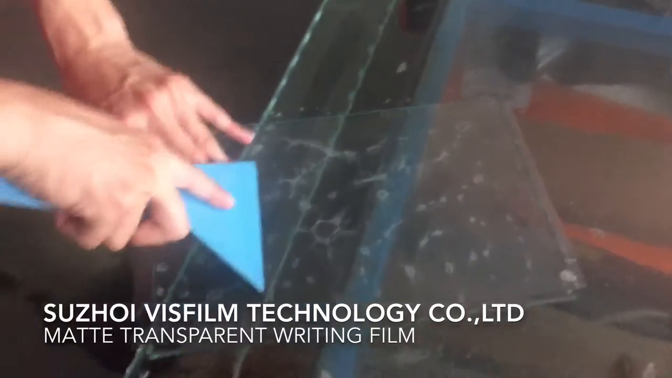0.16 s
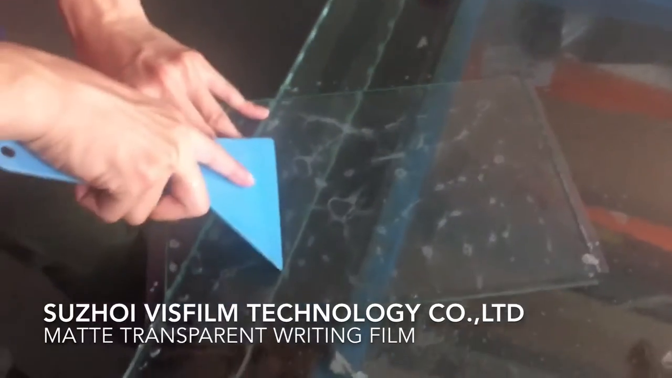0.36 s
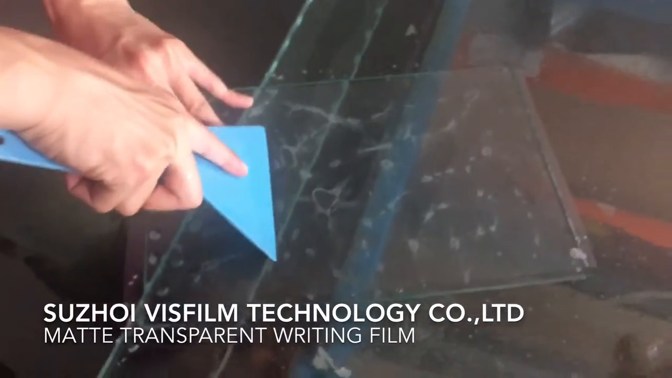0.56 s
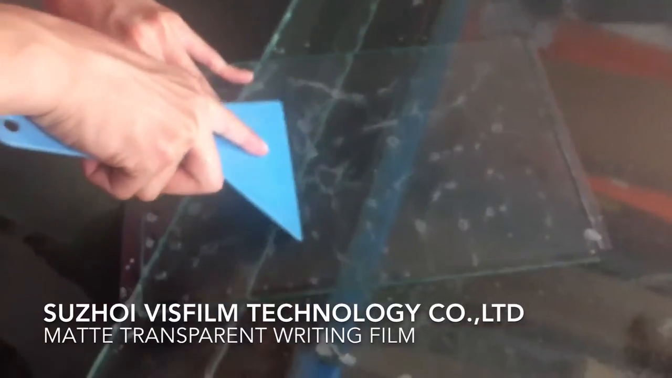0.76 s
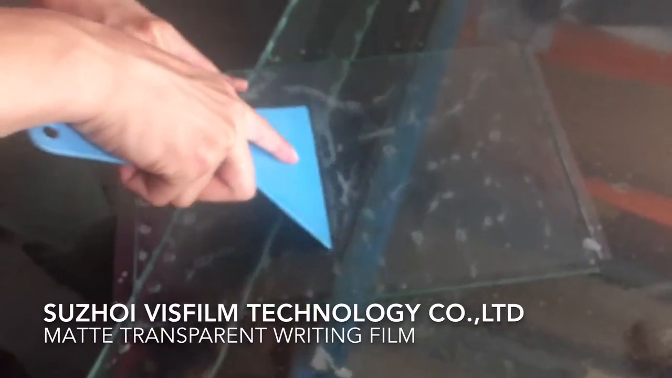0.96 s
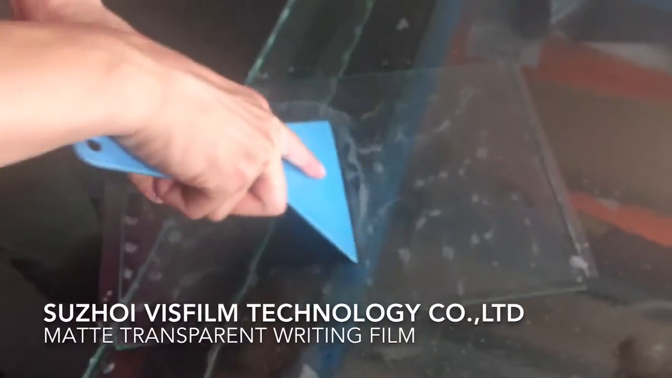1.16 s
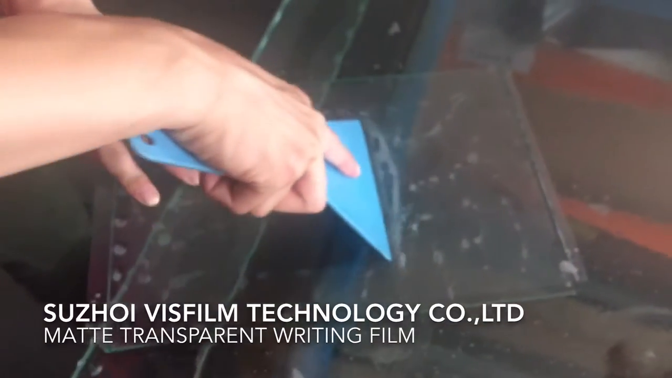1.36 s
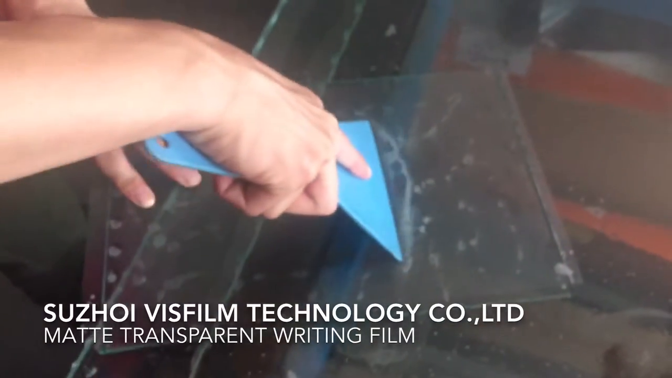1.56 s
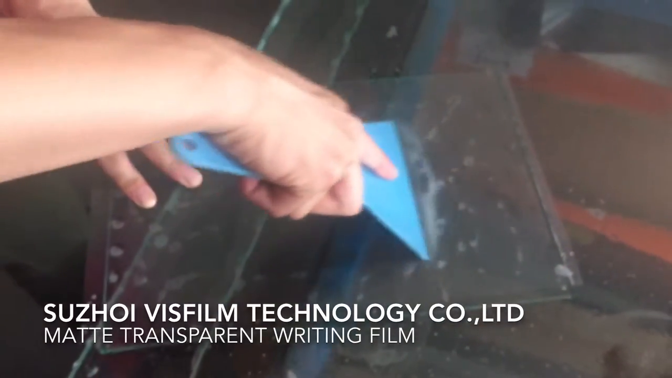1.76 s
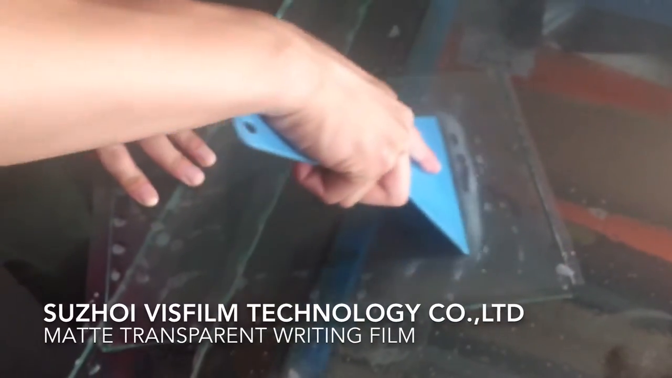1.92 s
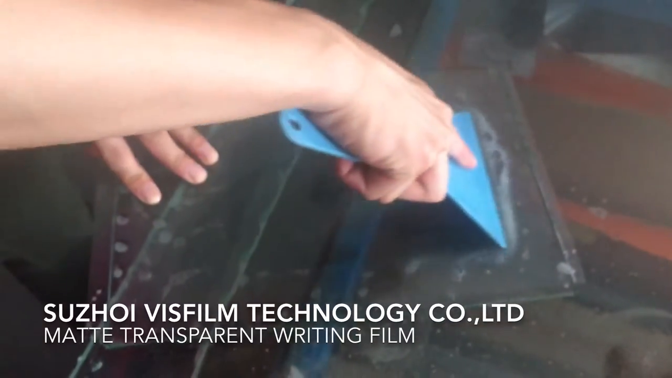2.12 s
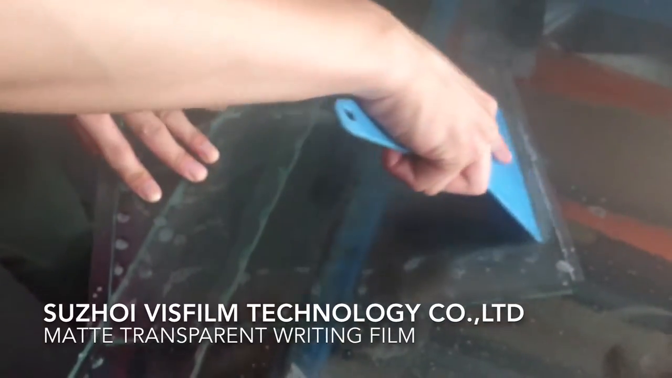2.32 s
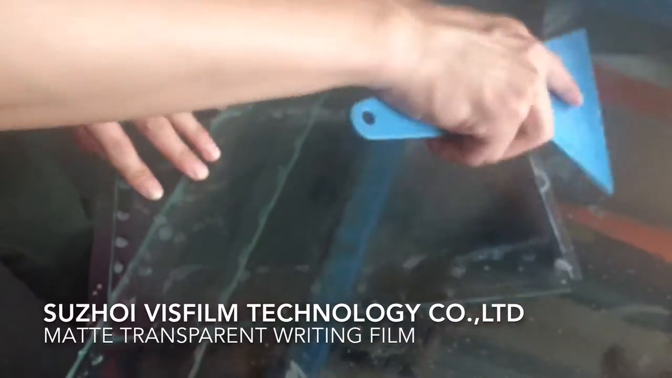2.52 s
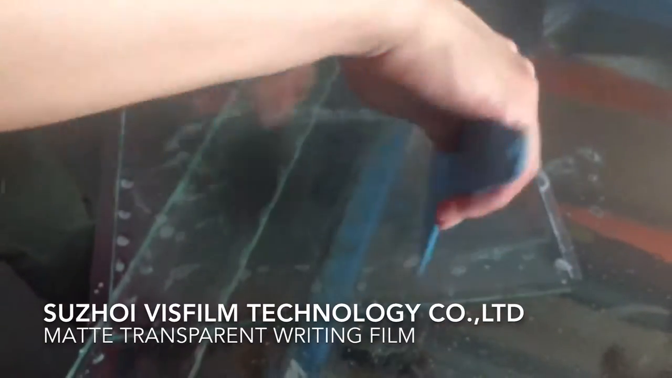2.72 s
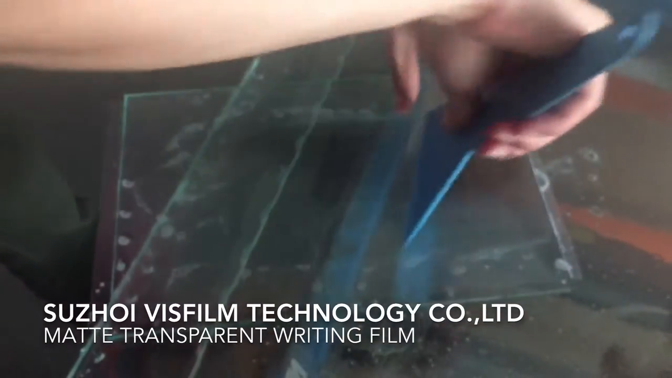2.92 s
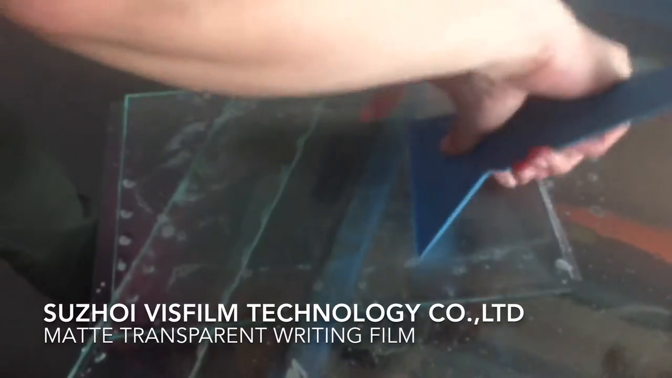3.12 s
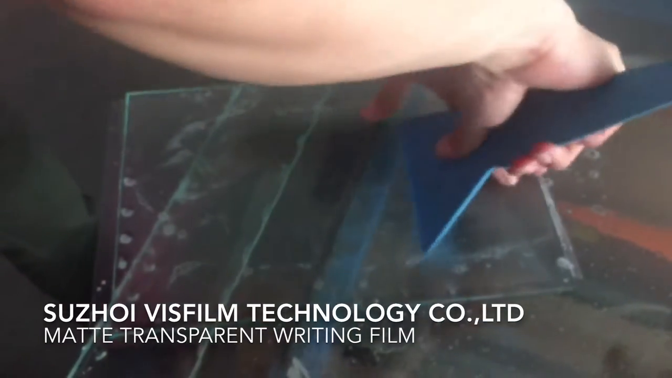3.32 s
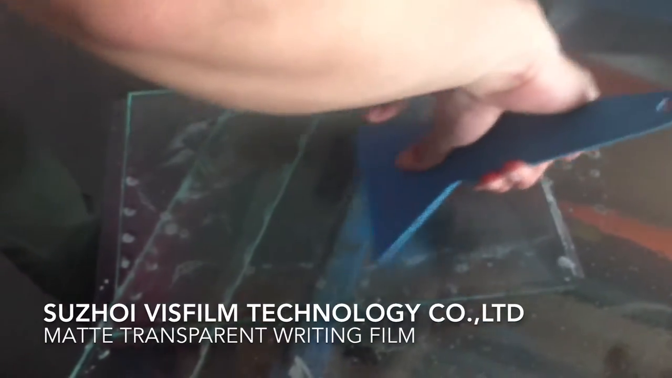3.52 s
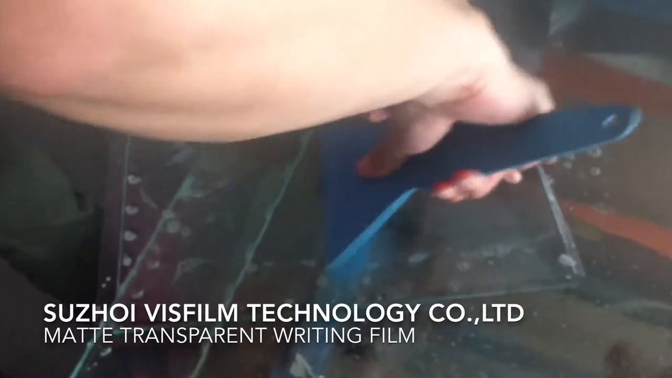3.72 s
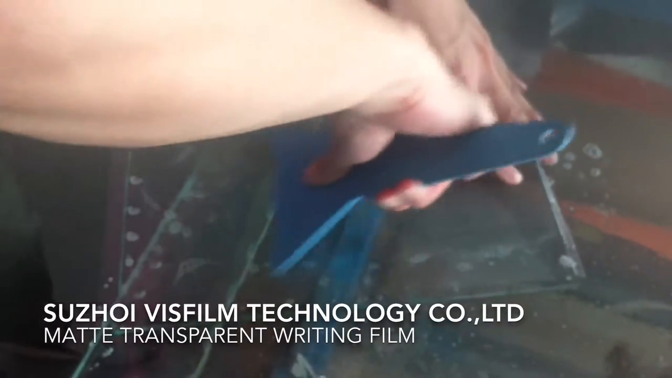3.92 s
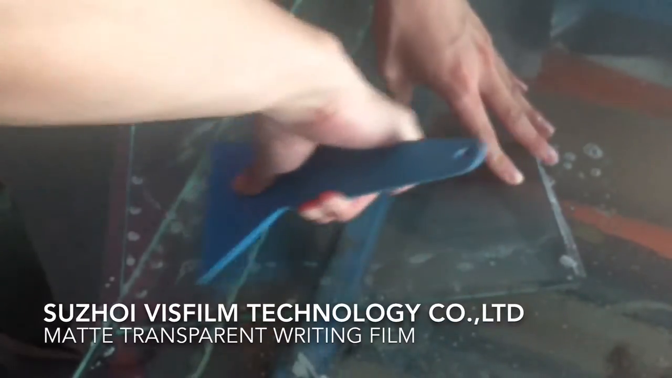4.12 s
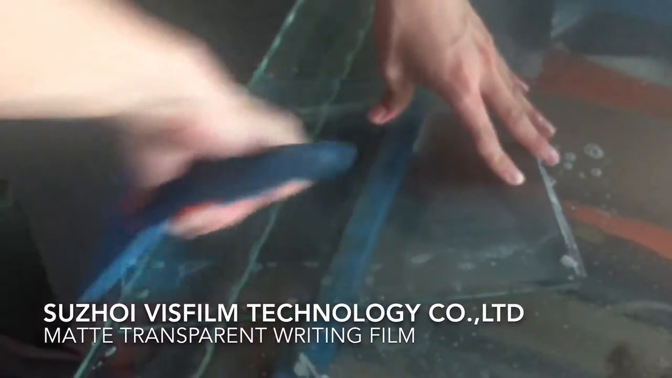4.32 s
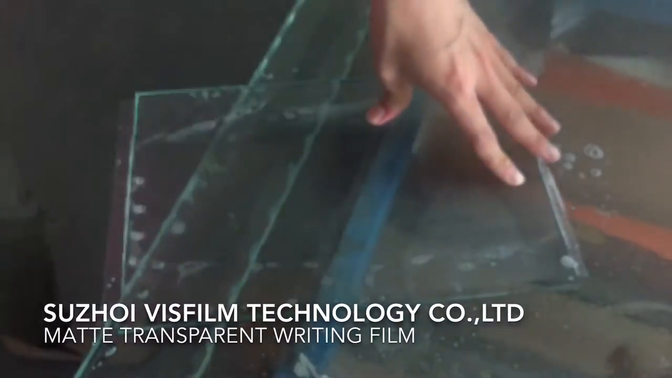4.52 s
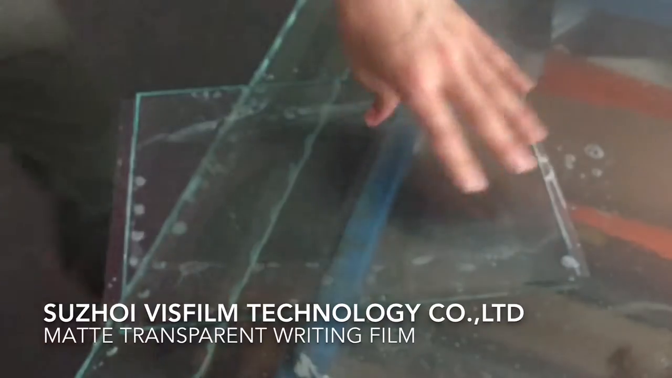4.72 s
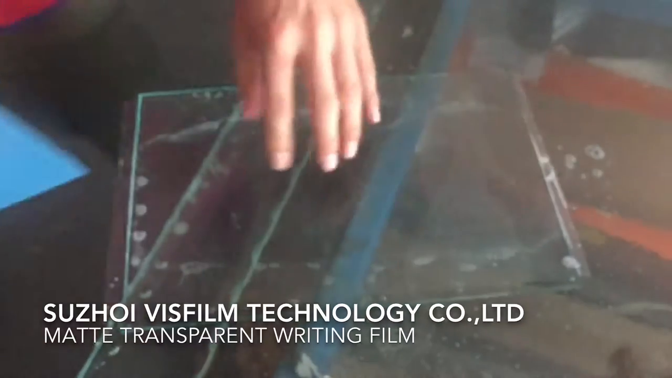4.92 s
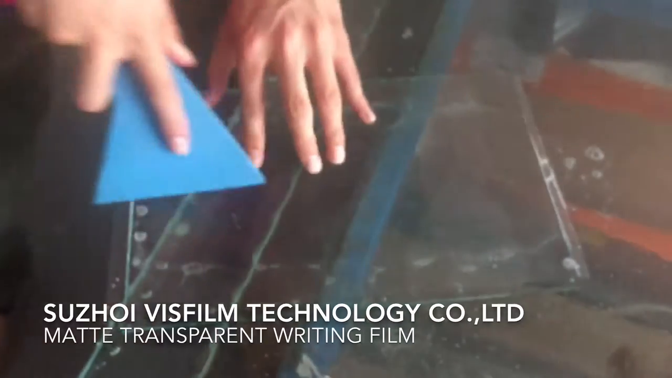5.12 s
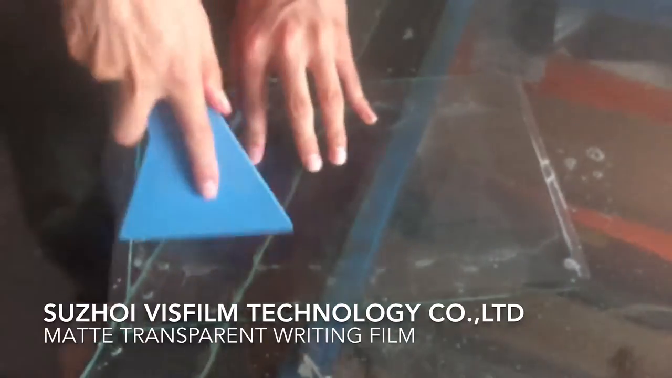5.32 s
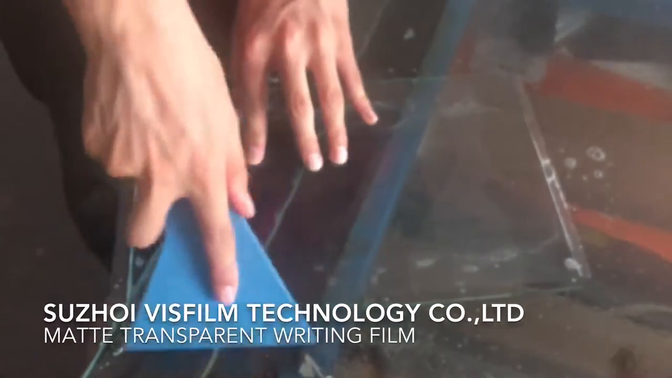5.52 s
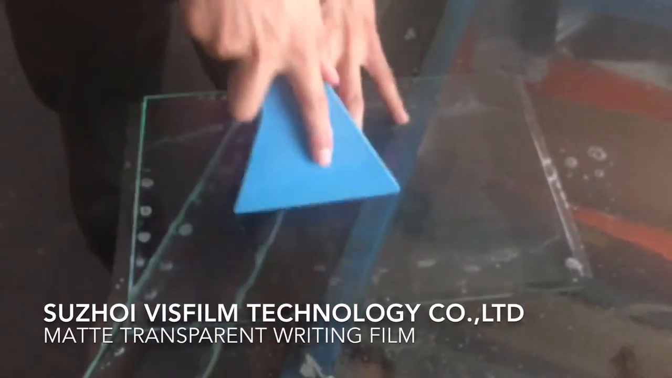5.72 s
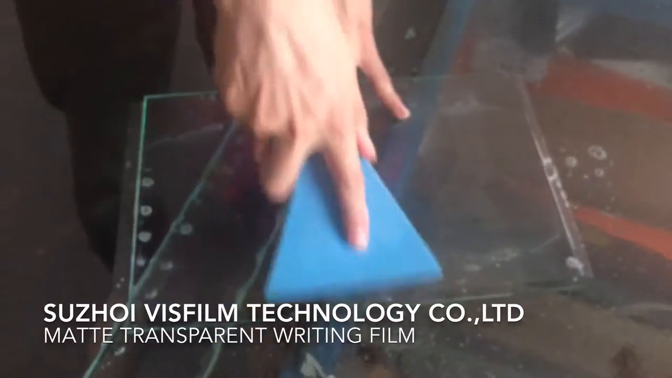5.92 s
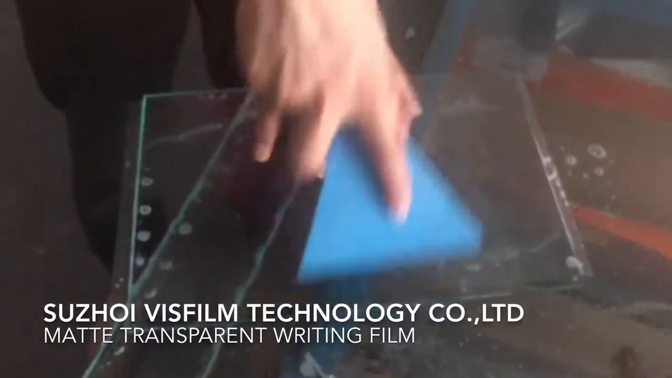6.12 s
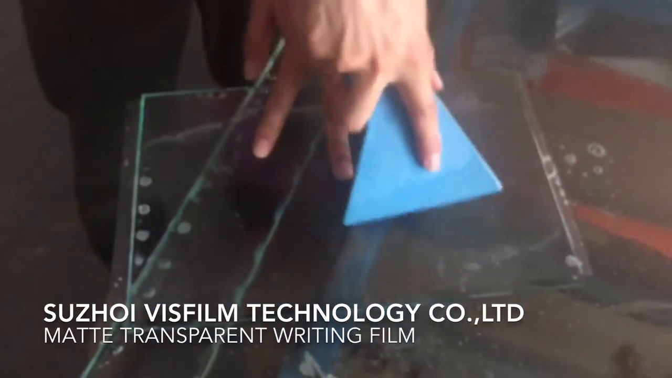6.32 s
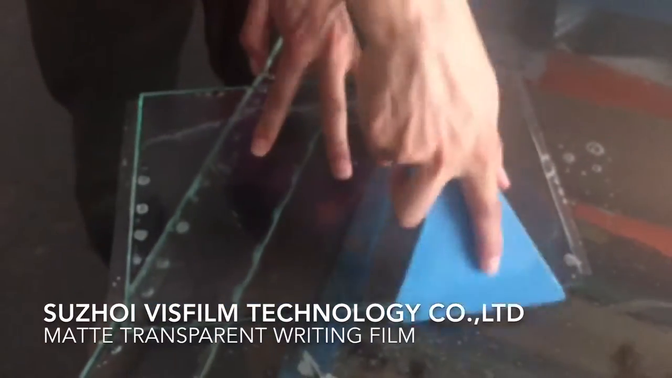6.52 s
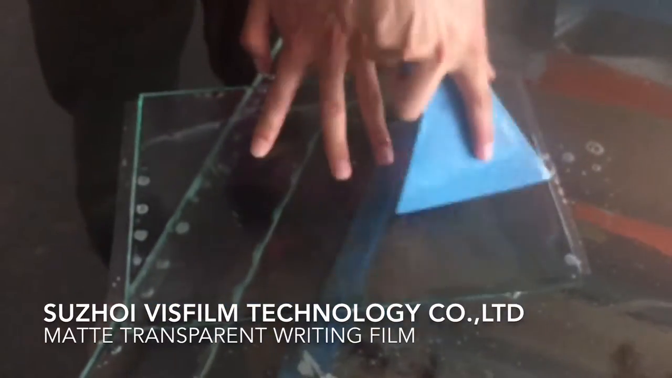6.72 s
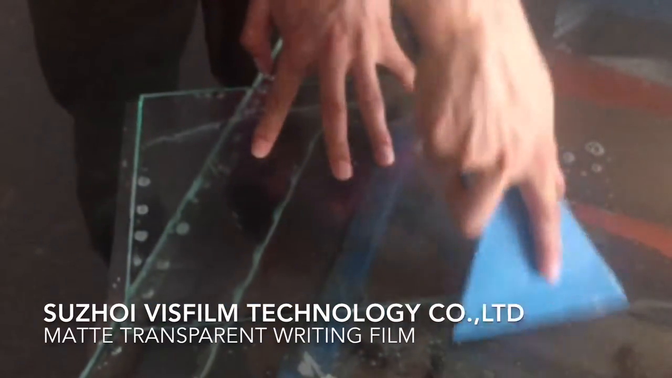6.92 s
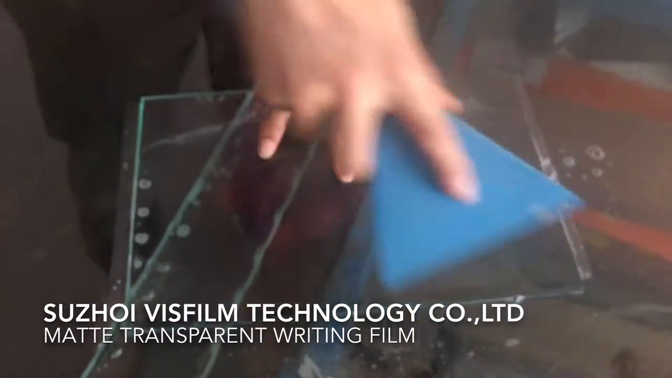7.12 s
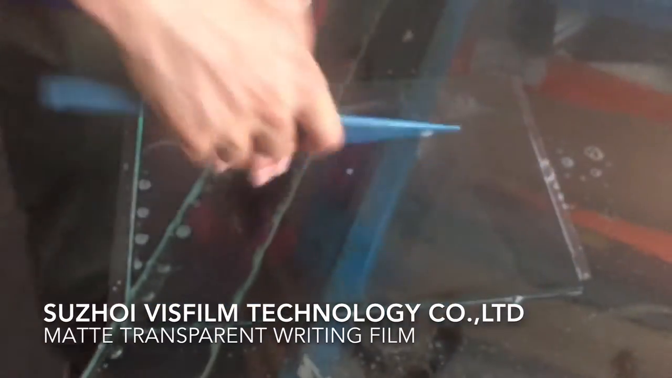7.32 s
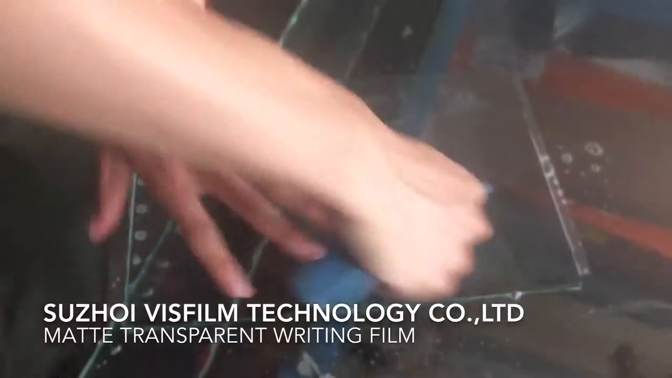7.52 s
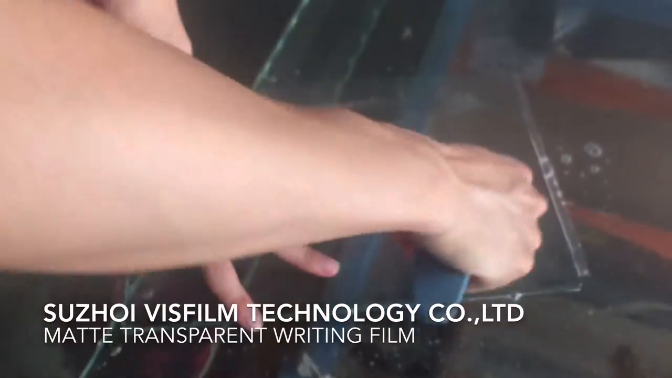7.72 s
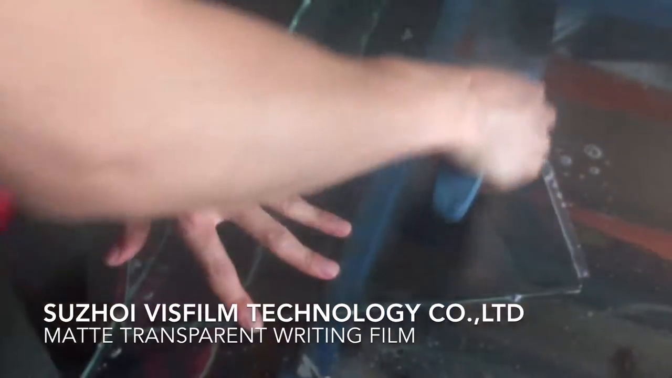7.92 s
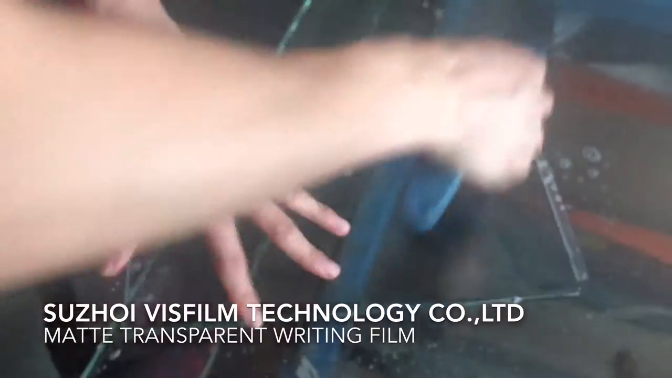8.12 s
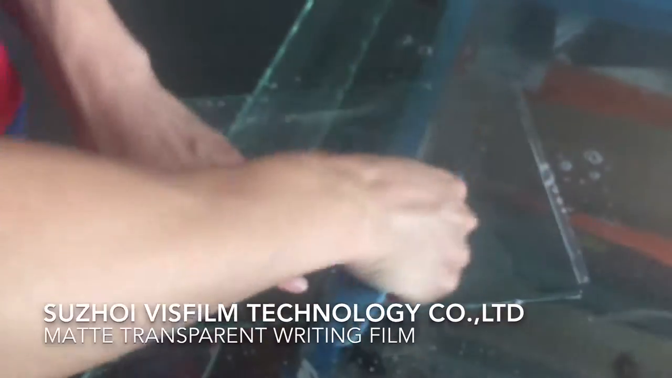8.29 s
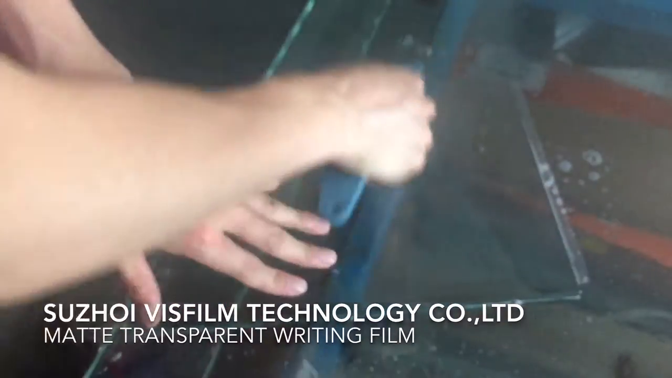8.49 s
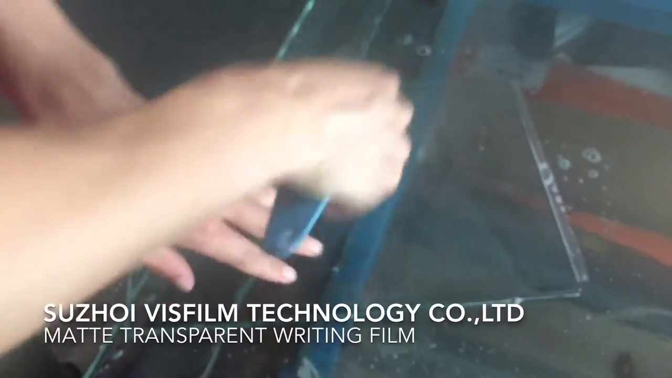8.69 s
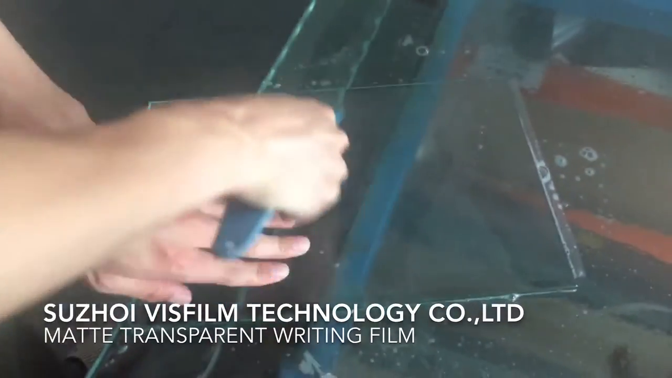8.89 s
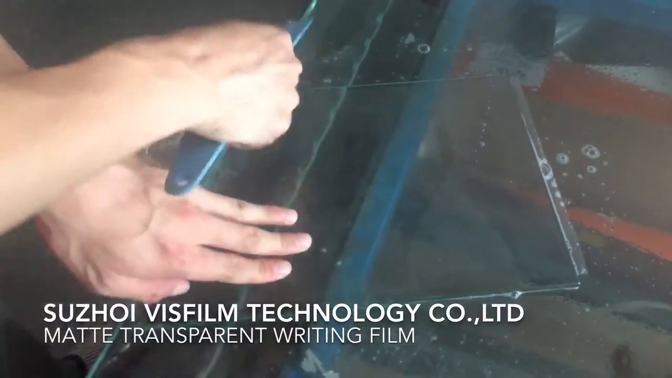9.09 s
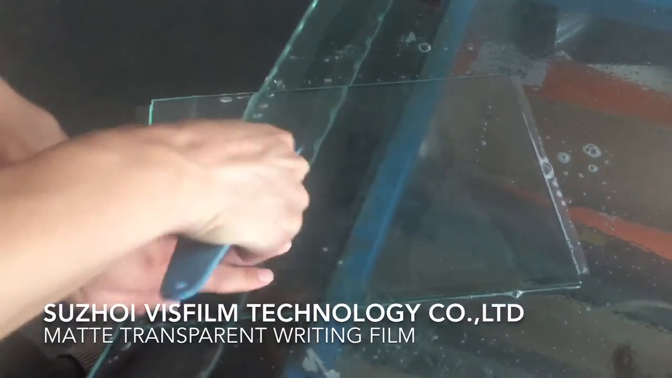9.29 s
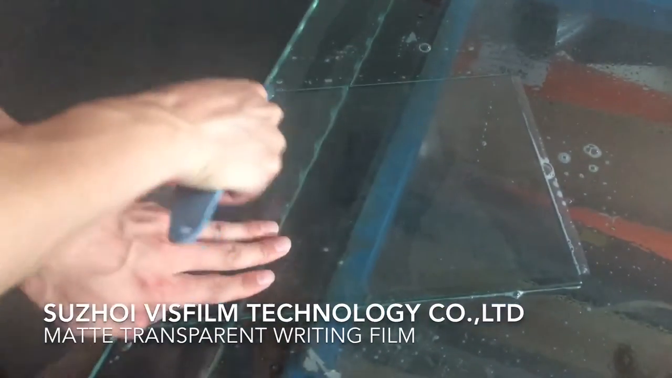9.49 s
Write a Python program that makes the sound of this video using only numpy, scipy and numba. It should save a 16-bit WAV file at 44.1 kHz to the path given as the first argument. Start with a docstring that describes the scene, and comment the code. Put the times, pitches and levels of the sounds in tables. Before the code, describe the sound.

Machinery hums and air rushes steadily in a small room while a plastic blade works over film on a wet glass pane near the microphone. Soft, slow rubbing turns into short, quicker shoves. Then four loud plastic taps each lead into a brief swish that rises in pitch. Finally the blade's edge scrapes four times, the first two strokes harshest, with an occasional faint thud from the bench.

```python
"""Squeegee on wet film

A plastic squeegee presses water from under a film on a glass pane, close by, in a small workshop.
It is pushed lightly, set down with a tap and pulled flat, then scraped hard on its edge.
Countless tiny slips hiss and ring the hand-damped blade; behind it machinery hums and air rushes."""
import sys
import numpy as np
from scipy import signal
from scipy.fft import rfft, irfft
from scipy.io import wavfile
from scipy.ndimage import uniform_filter1d
from numba import njit

SR = 44100
rng = np.random.default_rng(int(sys.argv[2]) if len(sys.argv) > 2 else 0)


def bounce(signal):
    """Save signal as a 16-bit WAV file at the path given by the first command-line argument."""
    frames = np.transpose(np.atleast_2d(signal))
    limited = np.clip(frames, -1, 1)
    pcm = np.round(limited * 32767).astype(np.int16)
    wavfile.write(sys.argv[1], SR, pcm)


N = 421155
TIME = np.arange(N) / SR


def undb(db):
    """Decibels to gain."""
    return 10 ** (np.asarray(db) / 20)


def unit(x):
    """Scale to rms 1."""
    return x / np.sqrt(np.mean(x ** 2))


def add(track, at_s, sound):
    """Mix a sound into a track."""
    start = int(at_s * SR)
    track[start:start + len(sound)] += sound[:N - start]


def decay(t, t60_s):
    """Exponential fall, 60 dB in t60_s."""
    return np.exp(-np.log(1000) * t / t60_s)


def swell(mid_s, half_s):
    """Rounded rise and fall, 1 at its middle."""
    return np.exp(-np.abs((TIME - mid_s) / half_s) ** 3)


def stroke(start_s, end_s, rise_s, lift_s=0.012):
    """Blade speed, 0-1: eases up, holds, drops as the blade lifts."""
    rise = np.sin(np.pi / 2 * np.clip((TIME - start_s) / rise_s, 0, 1)) ** 2
    return rise * np.clip(1 - (TIME - end_s) / lift_s, 0, 1)


def walk(rate_hz):
    """Smooth random motion, rms 1."""
    hold = max(int(SR / rate_hz), 2)
    steps = np.repeat(rng.standard_normal(N // hold + 1), hold)
    return unit(uniform_filter1d(uniform_filter1d(steps, hold), hold)[:N])


def tint(x, colour):
    """Minimum-phase filter shaped by (f/Hz, level/dB) points; attacks stay sharp."""
    size = 8192
    hz, db = np.transpose(colour)
    gain = undb(np.interp(np.log(np.fft.rfftfreq(size, 1 / SR) + 1), np.log(hz), db))
    cepstrum = irfft(np.log(gain))
    cepstrum[1:size // 2] *= 2
    cepstrum[size // 2 + 1:] = 0
    response = irfft(np.exp(rfft(cepstrum)))
    return signal.fftconvolve(x, response / np.linalg.norm(response))[:len(x)]


@njit
def svf(x, hz, width_hz):
    """State-variable band-pass, gain 1 at its moving centre."""
    out, band, low = np.empty(len(x)), 0., 0.
    for i in range(len(x)):
        g, damping = np.tan(np.pi * hz[i] / SR), width_hz / hz[i]
        v = (band + g * (x[i] - low)) / (1 + g * (g + damping))
        band, low = 2 * v - band, low + 2 * g * v
        out[i] = damping * v
    return out


def resonate(x, hz, *widths_hz):
    """Fixed or moving resonance: one band-pass per width, in series."""
    centre_hz = np.clip(hz * np.ones(len(x)), 20, .45 * SR)
    for width_hz in widths_hz:
        x = svf(x, centre_hz, float(width_hz))
    return x


def slips(rate_hz, spread_db, chatter_db):
    """Friction: tiny slips of uneven size, bunched as the blade grabs and lets go."""
    happens = rng.random(N) < rate_hz / SR
    size = undb(spread_db * np.minimum(rng.exponential(size=N), 5))
    return unit(happens * size * rng.standard_normal(N) * undb(chatter_db * walk(130)))


def catches():
    """Hiss gain: the blade judders harder where it catches late in a stroke."""
    # catches: middle t/s, half length/s, boost/dB
    snags = [(5.566, 0.01, 9), (6.048, 0.017, 15.5), (8.015, 0.0084, 14.5), (8.544, 0.0078, 2)]
    return undb(sum(db * swell(mid_s, half_s) for mid_s, half_s, db in snags))


def pulls(start_hz=1160, end_hz=2040, skid_s=0.042, brake_db=-3.5):
    """Pulled flat, the blade skids, speeds up and brakes; its broad resonance climbs along the stroke."""
    # flat pulls: landing t/s, leaving t/s, wait/s, skid level/dB, hiss level/dB, ring level/dB
    strokes = [(5.21, 5.575, 0.076, -42, -41.5, -39.5), (5.81, 6.045, 0.031, -42, -42.5, -36),
               (6.305, 6.575, 0.056, -45, -40, -37), (6.76, 6.98, 0.036, -49, -38.5, -39)]
    # hiss spectrum: f/Hz, level/dB
    colour = [(250, -12.5), (780, -14.5), (1150, -3), (2700, -1.5), (3400, -3.5), (4300, -1.5), (5100, -7),
              (6600, -5), (7900, -10), (9300, -4), (10500, -14), (11800, -7.5), (15500, -10)]
    hiss_gain = ring_gain = 0
    for land_s, leave_s, wait_s, skid_db, hiss_db, ring_db in strokes:
        skid = stroke(land_s, leave_s, rise_s=0.0098) * np.exp(-np.abs(TIME - land_s) / skid_s)
        brake = undb(brake_db * swell(leave_s, half_s=0.021))
        speed = stroke(land_s + wait_s, leave_s, rise_s=0.094) * brake
        hiss_gain += undb(skid_db) * skid + undb(hiss_db) * speed
        ring_gain += undb(ring_db) * (undb(2) * skid + speed)
    blade_hz = np.interp(TIME, np.array(strokes)[:, :2].ravel(), [start_hz, end_hz] * len(strokes))
    hiss = unit(tint(slips(14000, spread_db=1.2, chatter_db=0.1), colour))
    ring = unit(resonate(slips(7000, spread_db=0, chatter_db=2), blade_hz, 650, 1500))
    return undb(3) * hiss * hiss_gain * catches() + undb(-3.5) * ring * ring_gain


def scrapes(unbent_hz=2700, bend=0.081, drift=0.019, hiss_growth=1.03, ring_growth=0.77):
    """On edge the blade is stiffer: harsher slips ring higher modes, which shift as it bends."""
    # hard scrapes: start t/s, end t/s, rise/s, hiss level/dB, hiss fade/(dB/s),
    # ring level/dB, ring fade/(dB/s), start f/Hz, end f/Hz
    strokes = [(7.8, 8.03, 0.11, -35.5, 10, -25.5, 94, 1140, 3760),
               (8.355, 8.56, 0.12, -32, 7, -23.5, 55, 1750, 3870),
               (8.862, 9.085, 0.018, -40, -7, -37, -1, 2610, 2950),
               (9.396, 9.6, 0.012, -38.5, 74, -34.5, 23, 2870, 2930)]
    # modes of unbent blade and pane: f/Hz, width/Hz, level/dB
    modes = [(1465, 275, -1.5), (2110, 120, -2), (2670, 280, -1), (3110, 410, 0), (3490, 260, -3.5),
             (4210, 490, -2), (5840, 300, -4.5)]
    # hiss spectrum: f/Hz, level/dB
    colour = [(300, -18), (820, -28), (1300, -12.5), (2800, 3), (4400, 1), (5200, -1), (6400, 2.5),
              (7400, -4.5), (9000, 0), (10500, -4.5), (11800, -1.5), (15500, -4.5)]
    hiss_gain = ring_gain = 0
    for start_s, end_s, rise_s, hiss_db, hiss_fade, ring_db, ring_fade, _, _ in strokes:
        speed = stroke(start_s, end_s, rise_s)
        age_s = np.clip(TIME, start_s, end_s) - start_s
        hiss_gain += speed ** hiss_growth * undb(hiss_db - hiss_fade * age_s)
        ring_gain += speed ** ring_growth * undb(ring_db - ring_fade * age_s)
    blade_hz = np.interp(TIME, np.array(strokes)[:, :2].ravel(), np.array(strokes)[:, -2:].ravel())
    hiss = unit(tint(slips(20000, spread_db=1.5, chatter_db=1.8), colour))
    stretch = (blade_hz / unbent_hz) ** bend * (1 + drift * walk(11))
    drive = slips(11000, spread_db=3, chatter_db=0.5)
    body = sum(undb(db) * resonate(drive, hz * stretch, width, 4 * width) for hz, width, db in modes)
    rasp = resonate(slips(7100, spread_db=0, chatter_db=3), blade_hz, 350, 2900)
    ring = undb(-3) * unit(body) + undb(-4) * unit(rasp)
    return undb(3) * hiss * hiss_gain * catches() + ring * ring_gain


def taps(crack_t60_s=0.012, contact_s=0.0001, spread_oct=0.35, detune=0.023):
    """The blade lands or snaps off the rim: a crack and a brief ring; the contact favours some modes."""
    # taps: t/s, ring level/dB, favoured f/Hz, crack level/dB
    hits = [(.23, -58, 4000, -38), (2.167, -36, 2480, -36), (3.151, -48, 2900, -30.5),
            (4.398, -33, 1750, -23), (4.404, -16, 3130, -25.5), (5.2084, -14.5, 1010, -12),
            (5.575, -32, 1880, -22), (5.593, -37, 2610, -27.5), (5.808, -0.5, 1460, -1.5),
            (6.024, -25, 1840, -23), (6.048, -8.5, 1410, -9), (6.3045, -3, 1550, -7),
            (6.584, -29.5, 1890, -22), (6.76, -11.5, 1080, -14.5), (6.987, -28, 1970, -18.5),
            (7.629, -43, 2950, -25.5), (7.999, -31, 1500, -23), (8.0127, -29, 3800, -26),
            (8.027, -11.5, 1780, -14), (8.349, -33, 2420, -21), (8.571, -20, 2230, -32),
            (8.865, -24.5, 4090, -24), (9.036, -29.5, 1020, -33), (9.05, -28, 2970, -24.5),
            (9.3966, -30, 2160, -18)]
    # modes of the hand-held blade: f/Hz, t60/s
    modes = [(960, 0.023), (1370, 0.013), (1790, 0.015), (2850, 0.0082), (4000, 0.017)]
    # crack spectrum: f/Hz, level/dB
    colour = [(120, -25), (300, -1), (520, -4), (720, -8.5), (1100, 0), (2900, 1), (4800, -7), (6200, -8),
              (7800, -13), (9200, -14), (15500, -16)]
    out, t = np.zeros(N), TIME[:SR // 12]
    for at_s, ring_db, favoured_hz, crack_db in hits:
        ring = 0
        for k, (hz, t60_s) in enumerate(modes):
            share = (-1) ** k / (1 + (np.log2(hz / favoured_hz) / spread_oct) ** 2)
            detuned_hz = hz * (1 + detune * rng.standard_normal())
            ring += share * np.sin(2 * np.pi * detuned_hz * t) * decay(t, t60_s)
        ring *= 1 - np.exp(-t / contact_s)
        crack = tint(rng.standard_normal(len(t)) * decay(t, crack_t60_s), colour)
        add(out, at_s, undb(ring_db - 1) * ring / np.abs(ring).max() + undb(crack_db - 2) * crack)
    return out


def pushes(firm_db=-45, rub_growth=0.31, drag_s=2.215, drag_db=9.3):
    """Light gliding on wet film: dull rub and popping bubbles; hiss and singing take over with speed."""
    # slow, halting push, its hiss following blade speed: t/s, level/dB
    slow_push = [(0.45, -85), (0.53, -62), (0.65, -94), (0.7, -55), (0.75, -69), (1.08, -53.5), (1.11, -61),
                 (1.27, -49.5), (1.46, -60), (1.5, -85), (1.55, -50.5), (1.67, -96), (1.79, -47.5),
                 (1.89, -46.5), (1.99, -57.5), (2.14, -56), (2.17, -42.5), (2.38, -56), (2.45, -42.5),
                 (2.56, -75)]
    # quick shoves back: middle t/s, half length/s, level/dB
    shoves = [(3.429, 0.031, -45.5), (3.604, 0.038, -40), (3.818, 0.039, -38), (3.942, 0.05, -53.5),
              (4.029, 0.037, -35.5), (4.23, 0.047, -39), (4.382, 0.032, -37)]
    # hiss and bubble spectrum: f/Hz, level/dB
    colour = [(300, -29), (800, -24), (1400, -12), (2100, -11), (2900, -0.5), (4200, 1), (5100, -4),
              (6600, -1), (7600, -7), (9200, -3), (10500, -10), (11800, -5), (15500, -6)]
    push_s, push_db = np.transpose(slow_push)
    speed = undb(np.interp(TIME, push_s, push_db) + 1 - firm_db)
    speed *= stroke(push_s[0], push_s[-1], rise_s=0.03)
    speed += sum(undb(db - firm_db) * swell(mid_s, half_s) for mid_s, half_s, db in shoves)
    hiss = unit(tint(slips(16000, spread_db=-1.5, chatter_db=0.76), colour))
    pops = unit(tint(slips(200, spread_db=1, chatter_db=4), colour))
    rub = resonate(slips(6000, spread_db=1.5, chatter_db=2), 1680, 1900)
    rub = unit(resonate(rub, 1640, 2400))
    sing = resonate(slips(8700, spread_db=1.5, chatter_db=6.5), 2680, 470)
    sing = unit(resonate(sing, 2600, 1500))
    slow = undb(-5 + drag_db * swell(drag_s, half_s=0.06)) * rub + undb(-20) * pops
    fast = undb(2) * hiss + undb(-7.5) * sing
    return undb(firm_db) * (fast * speed + slow * speed ** rub_growth)


def fingers(slip_hz=853, waver=0.004, flicker_db=5):
    """Wet skin sticks and slips on the film as the grip changes: a thin squeak, then sizzle."""
    # wet skin spectrum: f/Hz, level/dB
    colour = [(3000, -5), (6800, -7), (8000, -10), (10200, -3), (11200, -7), (13000, -14), (15500, -14)]
    cycles = np.cumsum(slip_hz * (1 + waver * walk(60))) / SR
    harmonics = sum(undb(flicker_db * walk(25)) * np.sin(2 * np.pi * (k * cycles + rng.random()))
                    for k in range(8, 16))
    squeak = unit(tint(harmonics, colour))
    sizzle = unit(tint(slips(4000, spread_db=-1, chatter_db=0.5), colour))
    return undb(-54) * squeak * swell(7.54, 0.063) + undb(-53) * sizzle * swell(7.65, 0.095)


def bench(rise_s=0.0035, low_hz=45):
    """The bench under the pane shudders dully as weight shifts."""
    # shudders: t/s, level/dB, t60/s, upper edge f/Hz
    shudders = [(1.171, -38, 0.26, 90), (2.165, -38.5, 0.39, 255), (4.39, -42, 0.21, 600),
                (6.975, -40.5, 1, 405), (7.07, -36.5, 0.55, 130), (8.348, -38.5, 0.088, 550),
                (9.34, -45, 0.23, 480), (9.398, -34, 0.068, 580)]
    out, t = np.zeros(N), TIME[:SR]
    for at_s, db, t60_s, edge_hz in shudders:
        band = signal.butter(3, [low_hz, edge_hz], "band", fs=SR, output="sos")
        shake = unit(signal.sosfilt(band, rng.standard_normal(len(t))))
        add(out, at_s, undb(db) * shake * decay(t, t60_s) * (1 - np.exp(-t / rise_s)))
    return out


def room(x, level_db=-14, low_t60_s=0.38, treble_t60_s=0.33, split_hz=3500, first_s=0.0011):
    """Diffuse workshop echoes; the treble dies sooner."""
    t = TIME[:SR // 2]
    noise = rng.standard_normal(len(t))
    low = signal.sosfilt(signal.butter(1, split_hz, fs=SR, output="sos"), noise)
    tail = undb(3.5) * low * decay(t, low_t60_s) + (noise - low) * decay(t, treble_t60_s)
    tail *= t > first_s
    return undb(level_db) * signal.fftconvolve(x, tail / np.linalg.norm(tail))[:N]


def machinery(waver_db=2.4, drift=0.00501, rumble_db=-49, dip_db=-9.5, air_db=-47.5):
    """Wavering motor hum, a rumble that dips briefly early on, and rushing air with a thin whistle."""
    # motor hum partials: f/Hz, level/dB
    partials = [(66.5, -57), (199.5, -63.5), (266, -62.5), (532, -71.5)]
    # rumble spectrum: f/Hz, level/dB
    rumble_colour = [(22, -31), (36, -16), (50, -2.5), (67, 1), (88, -7), (110, -4), (145, -4.5),
                     (175, -10), (290, -16.5), (450, -25.5), (900, -53.5)]
    # air spectrum: f/Hz, level/dB
    air_colour = [(250, -6), (450, -10), (750, -9), (1000, -5), (1500, -4), (2200, 0), (2600, -2.5),
                  (2950, -0.5), (3500, -6), (4800, -17.5), (7000, -25), (11000, -31), (15500, -38)]
    motor_time_s = np.cumsum(1 + drift * walk(4)) / SR
    hum = 0
    for hz, db in partials:
        amplitude = np.sqrt(2) * undb(db + waver_db * walk(7.1))
        hum += amplitude * np.sin(2 * np.pi * (hz * motor_time_s + rng.random()))
    rumble = unit(tint(rng.standard_normal(N), rumble_colour))
    rumble *= undb(rumble_db + dip_db * swell(0.4, half_s=0.12) + 1.2 * walk(10))
    air = unit(tint(rng.standard_normal(N), air_colour))
    whistle = resonate(rng.standard_normal(N), 2906, 120)
    whistle = unit(resonate(whistle, 2940, 600))
    return hum + rumble + (air + undb(-11) * whistle) * undb(air_db + 0.7 * walk(5.5))


def scene():
    """Work, echoes and machinery at one microphone, the same in both channels."""
    work = pushes() + pulls() + scrapes() + taps() + fingers() + bench()
    return np.tile(work + room(work) + machinery(), (2, 1))


def record(dry, bass_hz=38, top_hz=15900):
    """The microphone loses the deep bass, clips at full scale and cuts the top."""
    thin = signal.sosfilt(signal.butter(4, bass_hz, "high", fs=SR, output="sos"), dry)
    top_cut = signal.ellip(10, .1, 70, top_hz, fs=SR, output="sos")
    return signal.sosfilt(top_cut, np.clip(thin, -1, 1))


dry = scene()
out = record(dry)
bounce(out)
```